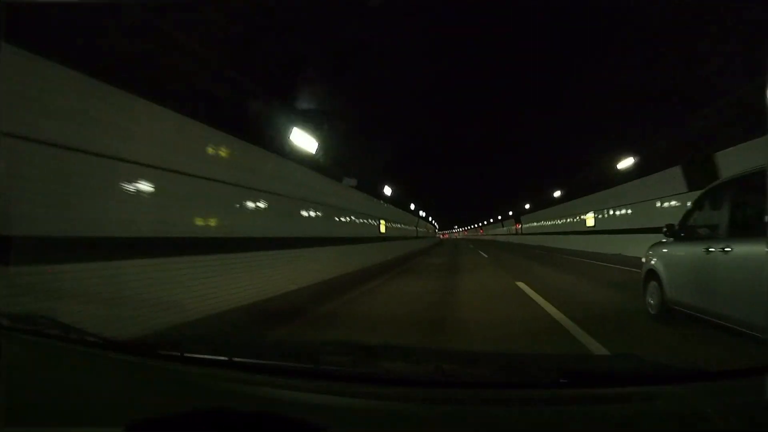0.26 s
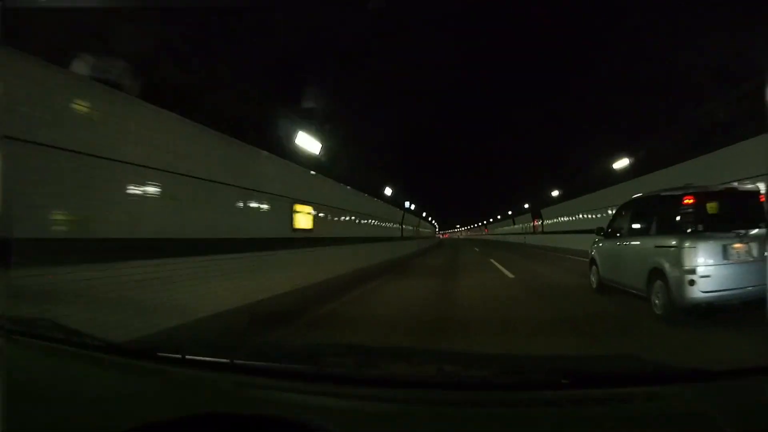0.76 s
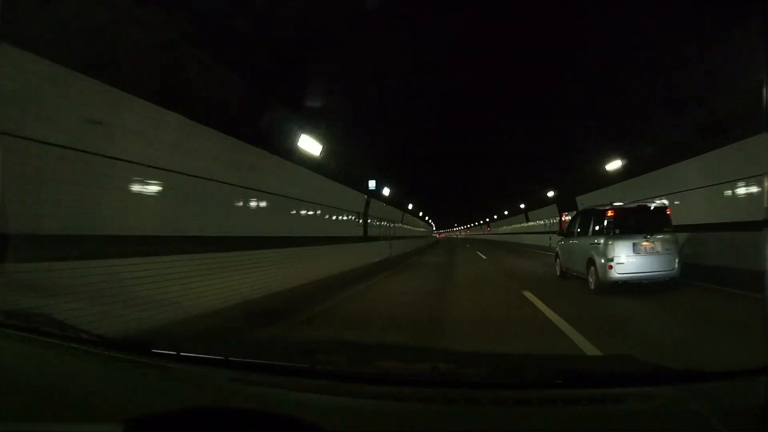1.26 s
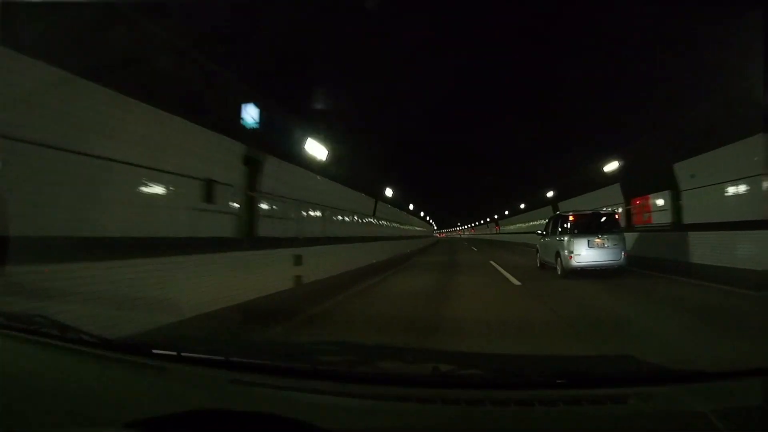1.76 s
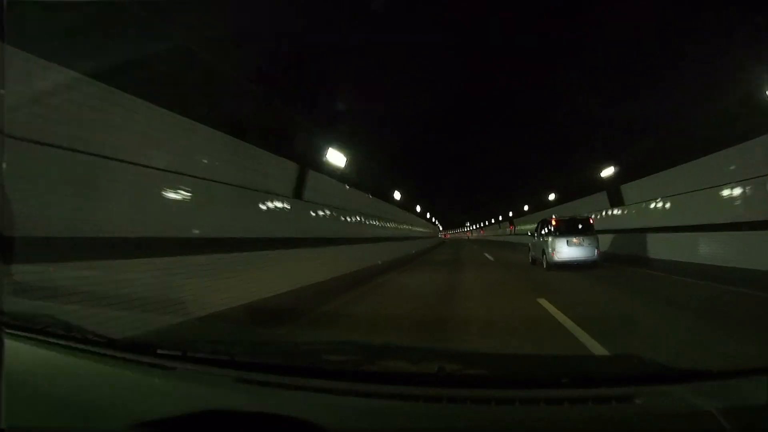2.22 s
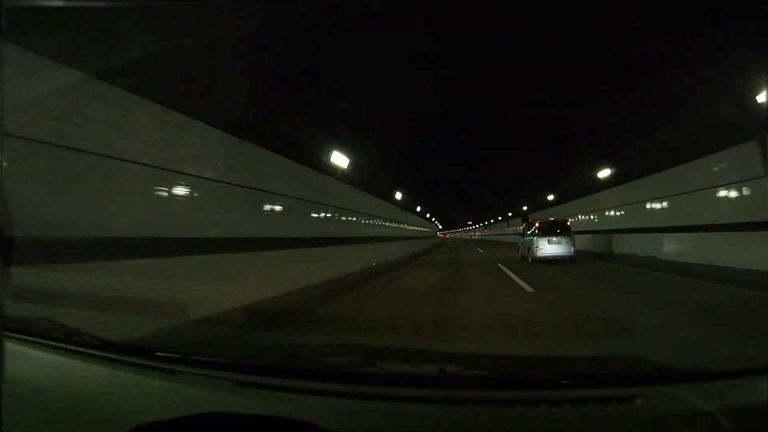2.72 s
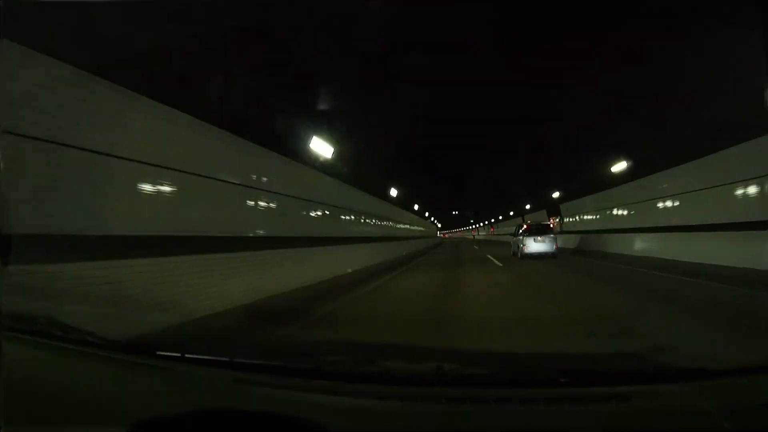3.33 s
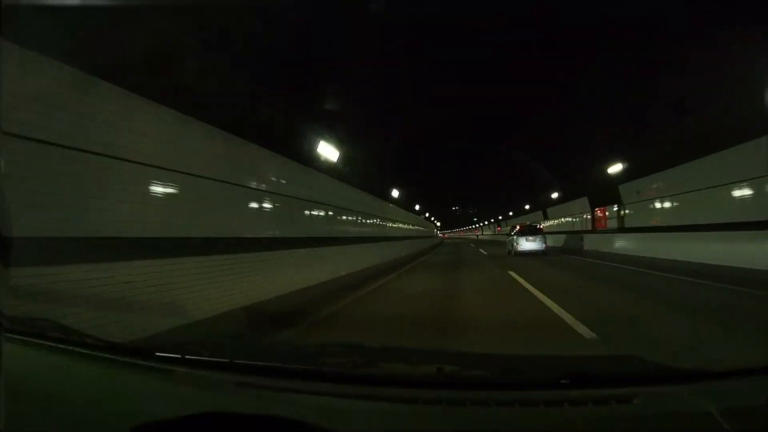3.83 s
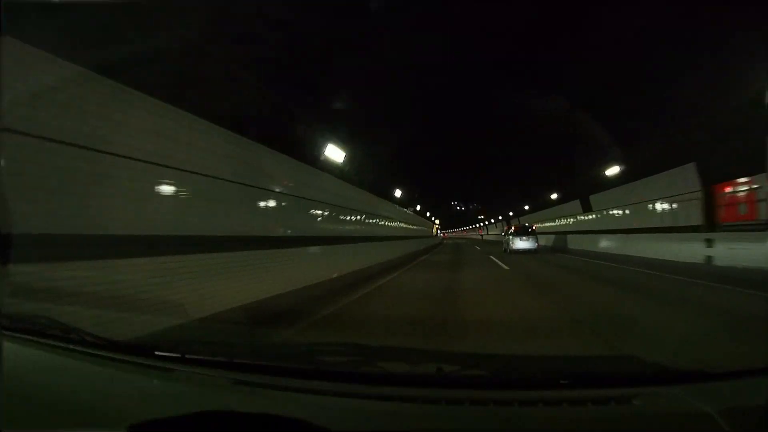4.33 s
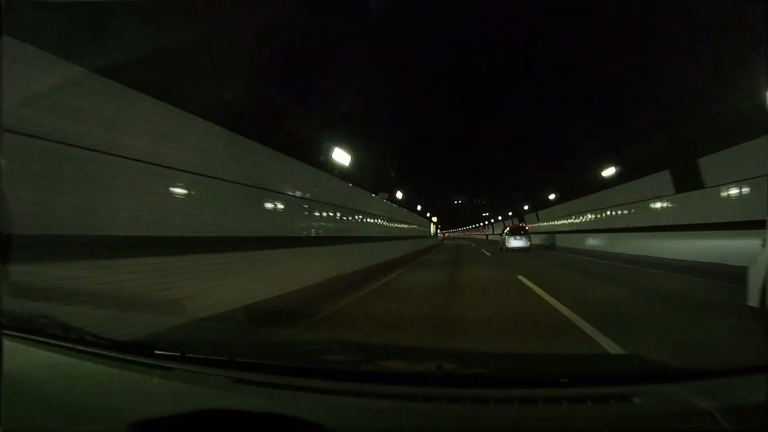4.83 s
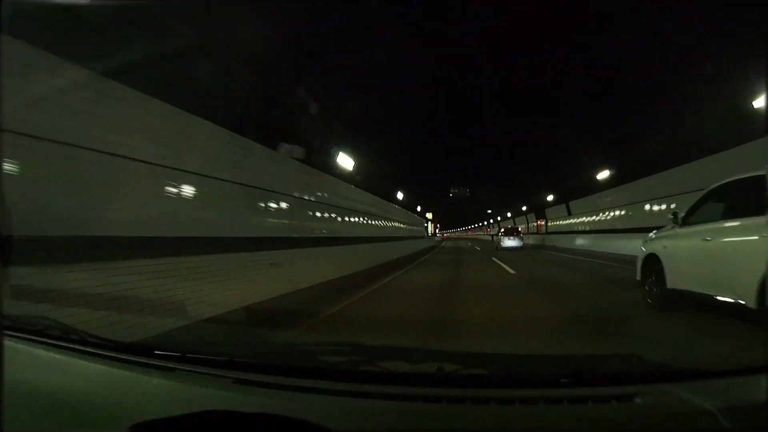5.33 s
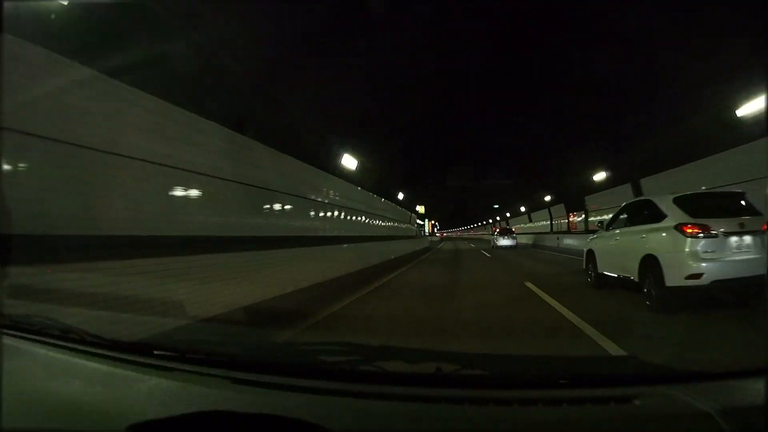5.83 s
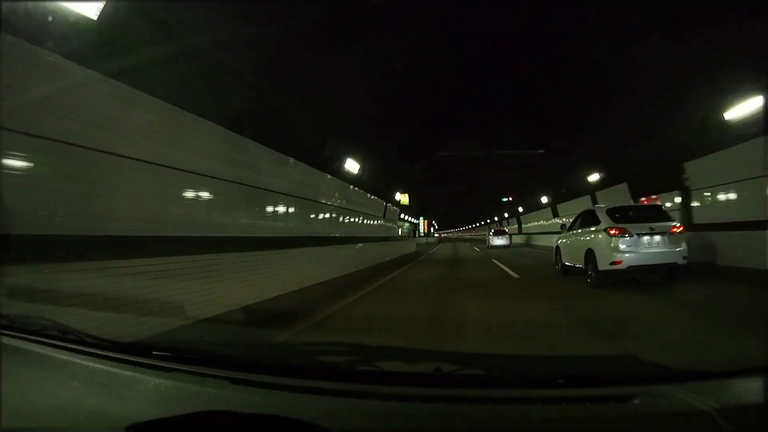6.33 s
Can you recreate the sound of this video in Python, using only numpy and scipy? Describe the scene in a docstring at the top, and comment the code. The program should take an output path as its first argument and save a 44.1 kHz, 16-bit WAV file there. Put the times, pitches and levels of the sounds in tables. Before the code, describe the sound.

Steady driving noise inside a car in a tunnel, picked up close by a small stereo microphone. Thick bass rumble lurches over road bumps, above a nearly buried engine drone. Fluttering tyre roar and thin window-seal hiss continue throughout. Trim snaps and rubs at two seconds, with a few weaker ticks near three. Overtaking cars add only subtle swells; the loudest booms are briefly squashed.

```python
"""A lumpy boom fills the cabin of a car cruising through a long road tunnel, heard from behind its windscreen.
Shaped noise makes the boom, tyre roar and hissing air; a faint engine drone is a sum of sines.
Two cars overtake as swells of tyre noise. Plastic trim ticks as decaying modes and rubs as grainy noise,
mostly about two seconds in. A recorder's limiter ducks the loudest crests."""
import sys
import numpy as np
from scipy import signal
from scipy.fft import rfft, irfft
from scipy.io import wavfile
from scipy.ndimage import uniform_filter1d

SR = 44100
rng = np.random.default_rng(int(sys.argv[2]) if len(sys.argv) > 2 else 0)


def transcribe(u):
    """Save the signal u as a 16-bit wav file named by the first command-line argument.

    u: samples, shape (n,) or (channels, n), limited to [-1, 1]; the rate is SR.
    q: integer samples, one column per channel.
    """
    v = np.clip(np.atleast_2d(u).T, -1, 1)
    q = np.round(v * 32767).astype(np.int16)
    wavfile.write(sys.argv[1], SR, q)


N = 289737
T, HZ = np.arange(N) / SR, np.fft.rfftfreq(N, 1 / SR)


def amp(db):
    """Decibel law: level in dB to amplitude ratio."""
    return 10 ** (np.asarray(db) / 20)


def unit(x):
    """Normalisation to a root-mean-square of 1."""
    return x / np.sqrt(np.mean(x ** 2) + 1e-20)


def along(points):
    """Logarithmic pitch scale: a table of (Hz, value) read at every frequency."""
    hz, value = np.transpose(points)
    return np.interp(np.log(HZ + 1), np.log(hz + 1), value)


def level(rows, order):
    """Amplitude envelope: one dB column of a time curve as a gain at every sample."""
    columns = np.transpose(rows)
    return amp(np.interp(T, columns[0], columns[order]))


def drift(rate_hz):
    """Band-limited random modulation of rms 1, up to about the given rate."""
    knots = rng.standard_normal(N // 32)
    return unit(np.interp(T * 2 * rate_hz, np.arange(len(knots)), knots))


def bell(middle_s, spread_s):
    """Gaussian envelope with a peak of 1."""
    return np.exp(-((T - middle_s) / spread_s) ** 2 / 2)


def swells(rows, order):
    """Superposed Gaussian swells in dB, their heights taken from one column of the events."""
    return sum(row[order] * bell(row[0], row[1]) for row in rows)


def resonance(hz, width_hz):
    """Resonance curve: a steep-sided gain peak at one frequency."""
    return 1 / (1 + ((HZ - hz) / (0.87 * width_hz)) ** 2)


def modes(rows):
    """Power addition: joint gain of several resonances, each at its own share in dB."""
    power = sum((amp(db) * unit(resonance(hz, width_hz))) ** 2 for hz, width_hz, db in rows)
    return np.sqrt(power)


def spectrum(points):
    """Spectral colouring: a table of (Hz, dB) as a gain that falls steeply past its last point."""
    return amp(along(points)) * np.minimum(1, points[-1][0] / (HZ + 1)) ** 8


# Likeness of the two microphone ports. Each row: frequency in Hz, correlation from 0 to 1.
PORT_LIKENESS = [(30, .99), (300, .996), (900, .97), (1500, .82), (2200, .62), (4000, .35), (6400, .15),
                 (7600, .6), (8400, .35), (11000, .3), (15000, .15)]
# Phase between the ports. Each row: frequency in Hz, lead of the left port in radians.
PORT_LEAD = [(25, .75), (60, .45), (125, .32), (280, .2), (700, 0), (1300, -.35), (2500, -.15), (3600, -.7),
             (5200, -2.9), (9500, -4.2), (11500, -6.3)]
# Balance of the ports. Each row: frequency in Hz, left minus right level in dB.
PORT_BALANCE = [(60, 0.5), (91, -3), (140, 0.7), (210, -0.2), (320, 0.3), (490, 1.7), (750, 2.5),
                (1150, 0.2), (1750, -1.2), (2660, -0.63)]


def cabin_noise(gain):
    """Spatial coherence: coloured noise at two close ports, alike in the bass and looser in the treble."""
    left, other = rng.standard_normal((2, len(HZ))) + 1j * rng.standard_normal((2, len(HZ)))
    same = np.clip(along(PORT_LIKENESS), 0, 1)
    lean = amp(along(PORT_BALANCE) / 2)
    right = (same * left + np.sqrt(1 - same ** 2) * other) * np.exp(-1j * along(PORT_LEAD))
    return unit(irfft(gain * np.array([left * lean, right / lean]), N))


def steadied(noise):
    """Power levelling over 0.2 s: evens out slow swells of a narrow noise and keeps its quick beats."""
    power = uniform_filter1d((noise ** 2).mean(0), size=SR // 5)
    return noise / np.sqrt(power + 1e-9)


# Long waves in the road work the suspension. Each row: time in seconds, deep shake in dB.
ROAD_WAVES = [(0, 2), (0.4, 0), (0.9, -3), (2.1, 3.5), (2.6, 1), (3.3, 1), (3.9, -4), (4.3, 5), (5.1, -2),
              (5.7, 0.5), (6.25, -3), (6.57, -9)]


def suspension_shake():
    """Amplitude modulation by the slow heave of the car on its suspension."""
    return level(ROAD_WAVES, order=1)


# Level of the tyre roar, with the limiter's dip after the boom at 4.6 s.
# Each row: time in seconds, base level in dB.
ROAR_LEVEL = [(0.0, -28.5), (0.25, -29.5), (0.53, -27.5), (0.71, -27), (0.82, -29.5), (1.02, -29),
              (1.4, -28), (1.6, -30), (2.1, -28), (2.34, -27), (2.68, -28.5), (2.85, -28), (3.0, -29.5),
              (3.3, -27.5), (3.43, -30), (3.58, -26.5), (3.88, -31), (4.09, -27), (4.33, -30), (4.55, -27),
              (4.65, -33.3), (4.82, -30), (5.01, -27), (5.14, -31), (5.4, -30), (5.56, -31), (5.68, -27.5),
              (5.88, -28.5), (6.06, -30), (6.57, -30.5)]


def follow(start_db, share, fade_db_per_s):
    """Shared modulation: a layer takes part in the tyre roar's swings and slowly fades."""
    swing = level(ROAR_LEVEL, order=1) / amp(-28.5)  # relative to a middling roar in dB
    return amp(start_db - fade_db_per_s * T) * swing ** share


# Bumps in the road. Each row: middle in seconds, spread in seconds, pitch shaken in Hz, swell in dB.
ROAD_BUMPS = [(0.09, 0.031, 269, 4.5), (0.326, 0.023, 180, 5), (0.693, 0.025, 266, 6), (.76, 0.047, 137, 2),
              (0.974, 0.027, 180, 7.5), (1.175, 0.084, 140, 7), (1.343, 0.15, 266, 4), (1.3, 0.18, 327, 4),
              (1.62, 0.16, 117, 6.5), (1.91, .06, 118, 9.5), (2.147, 0.076, 266, 5.5),
              (2.43, 0.091, 180, 3.5), (2.55, 0.028, 133.7, 17), (2.916, 0.099, 114, 4.5),
              (3.067, 0.072, 266, 6), (3.318, 0.073, 180, 6.5), (3.577, 0.033, 266, 7),
              (3.678, 0.076, 180, 9), (3.903, 0.047, 115, 7), (4.12, 0.12, 139, 6),
              (4.596, 0.038, 116, 12.5), (4.864, 0.069, 116, 4.5), (5.073, .07, 177, 8.5),
              (5.276, .15, 117, 9), (5.8, 0.099, 140, 10), (6.0, .3, 328, 8.5), (6.033, 0.058, 266, 8),
              (6.137, 0.019, 115, 14.5), (6.31, 0.082, 114, 6.5), (6.344, 0.094, 180, 4.5)]


def jolt(hz, reach_hz=9.5):
    """Selective excitation: a resonance swells on each bump that shakes the car near its pitch."""
    swell_db = 0
    for middle_s, spread_s, shake_hz, db in ROAD_BUMPS:
        nearness = np.exp(-((hz - shake_hz) / reach_hz) ** 2 / 2)
        swell_db = swell_db + db * nearness * bell(middle_s, spread_s)
    return amp(swell_db)


# Engine orders. Each row: multiple of the firing rate, middle level in dB before the shake.
FIRING_ORDERS = [(1, -42), (2, -52.5)]


def engine(firing_hz=70.1, waver_db=5.5, wander=0.0054):
    """Harmonic series: low firing orders wander slightly and swell as the body is shaken."""
    turns = np.cumsum(firing_hz * (1 + wander * drift(2.4))) / SR
    drone = 0
    for order, db in FIRING_ORDERS:
        drone = drone + amp(db + waver_db * drift(1.4)) * np.sin(2 * np.pi * order * turns)
    return suspension_shake() * drone


# Cars in the next lane. Each row: time alongside in seconds, spread in seconds, peak level in dB.
OVERTAKERS = [(0.104, 0.8, -41.5), (4.254, 0.47, -42.5)]
# Their tyre noise through the side windows. Each row: frequency in Hz, relative dB per Hz.
OVERTAKER_COLOUR = [(500, -40.5), (800, -9), (1050, 0.5), (1500, -1.5), (1750, -5.5), (2100, -28.5)]


def overtaking():
    """Level change with distance: the tyre noise of other cars swells and fades as they draw past."""
    near = sum(amp(db) * bell(middle_s, spread_s) for middle_s, spread_s, db in OVERTAKERS)
    return near * cabin_noise(spectrum(OVERTAKER_COLOUR))


# Air streaming over the body. Each row: frequency in Hz, relative dB per Hz.
AIR_COLOUR = [(1500, -30), (2200, -1.5), (2650, 0.5), (2950, -0.5), (3200, 1.9), (3450, -3), (3750, -5),
              (4500, -6), (5200, -12), (6500, -18.5)]
# Fine hiss at the window seals. Each row: frequency in Hz, relative dB per Hz.
SEAL_COLOUR = [(2400, -39), (5200, -3.5), (6400, 2.5), (7150, -0.5), (7600, -1), (8100, -2.5), (9200, -5.5),
               (12500, -11), (13500, -11.5), (15500, -16)]
# Gusts along the body. Each row: middle in seconds, spread in seconds, air change in dB, seal change in dB.
BODY_GUSTS = [(.62, 0.051, 2.5, 3), (1.02, 0.021, 0, 2), (1.21, .025, -1, 3), (1.42, 0.045, 1.5, 4.5),
              (2.16, 0.23, 2, 2.5), (2.44, 0.045, 1, 1.5), (2.88, 0.13, 1.5, 3), (4.34, 0.035, 1, 3.5),
              (4.55, 0.044, 1, 4), (5.63, 0.009, 2, 5), (6.12, 0.12, 2, 1), (6.26, .014, 0.5, 7)]
# Air, then seals. Each row: starting level in dB, share of the roar's swings from 0 to 1, fade in dB per s.
AIR_FOLLOW = (-49, 0.72, 0.25)
SEAL_FOLLOW = (-60, .3, 0.14)


def slipstream(gust_db=0.85, flicker_db=1.5, grain_db=1, waver_db=0.36):
    """Turbulent flow noise: air rushes by and hisses unevenly at the seals, with a faint fitful whistle."""
    rush = amp(swells(BODY_GUSTS, order=2) + gust_db * drift(14)) * cabin_noise(spectrum(AIR_COLOUR))
    unevenness_db = waver_db * drift(7) + flicker_db * drift(32) + grain_db * drift(400)
    flicker = amp(swells(BODY_GUSTS, order=3) + unevenness_db)
    hiss = cabin_noise(spectrum(SEAL_COLOUR))
    whistle = amp(-21.0 + 3.7 * drift(16)) * cabin_noise(resonance(hz=11070, width_hz=75))
    return follow(*AIR_FOLLOW) * rush + follow(*SEAL_FOLLOW) * flicker * (hiss + whistle)


# Tyre roar in the tunnel. Each row: frequency in Hz, relative dB per Hz.
ROAR_COLOUR = [(240, -51), (416, -14.5), (434, -1.5), (480, -0.5), (524, -1), (604, -1), (691, -1),
               (785, -5), (912, -7), (998, -3.5), (1080, -5.5), (1650, -10.5), (1780, -15.5), (1950, -18.5),
               (2190, -25.5), (2400, -30.5), (3120, -45.5), (5280, -120)]


def tyres(flutter_db=0.68):
    """Broadband contact noise off the tunnel walls, with the fuzzy note of air piping in the tread grooves."""
    roar = amp(-0.06 + flutter_db * drift(18)) * cabin_noise(spectrum(ROAR_COLOUR))
    grooves = amp(-14.5) * cabin_noise(resonance(hz=961, width_hz=44))
    return level(ROAR_LEVEL, order=1) * (roar + grooves)


# Air ringing inside the tyres. Each row: frequency in Hz, width in Hz, share in dB.
CAVITY_MODES = [(251.8, 9.6, 0), (279.4, 13.8, 1.6)]
# The row: starting level in dB, share of the roar's swings from 0 to 1, fade in dB per s.
CAVITY_FOLLOW = (-26.5, 0.32, 0.3)


def tyre_cavity():
    """Cavity resonance: the tyre air rings on bumps and slowly fades as the road surface changes."""
    middle_hz = np.mean(CAVITY_MODES, axis=0)[0]
    ring = steadied(cabin_noise(modes(CAVITY_MODES)))
    return follow(*CAVITY_FOLLOW) * jolt(middle_hz) * ring


# Rubs of the trim. Each row: middle in seconds, spread in seconds, rasp in dB, fizz minus rasp in dB.
TRIM_RUBS = [(0.462, .005, -56, 0), (1.969, .005, -49.5, 2), (1.987, .007, -45, -1),
             (2.023, 0.0037, -48, -2), (2.064, .006, -54, -4), (2.097, 0.0066, -45.5, -2),
             (2.143, .006, -53.5, 3), (2.175, 0.011, -46.5, -6), (2.199, .009, -56, 2),
             (2.235, .012, -61, 1), (2.765, .007, -58, 2), (2.84, .007, -54, 2), (2.884, .009, -57, -2),
             (2.913, .008, -55.5, 0), (3.034, .008, -56.5, 0)]


def trim_rubs(grain_db=4.0):
    """Friction noise: short grainy scuffs as the plastic slips, some raspy, some a thin fizz."""
    rasp = sum(amp(db) * bell(s, spread_s) for s, spread_s, db, fizz_db in TRIM_RUBS)
    fizz = sum(amp(db + fizz_db) * bell(s, spread_s) for s, spread_s, db, fizz_db in TRIM_RUBS)
    # colours as (Hz, relative dB per Hz)
    low = cabin_noise(spectrum([(200, -71), (3000, -9), (6300, -2.0), (9000, -9), (15500, -23)]))
    high = amp(-7) * cabin_noise(spectrum([(4000, -38), (9000, -2), (15500, -3)]))
    return amp(grain_db * drift(700)) * (rasp * low + fizz * high)


def add(mix, s, sound):
    """Superposition of a short sound onto the mix at a time in seconds."""
    part = mix[:, round(s * SR):][:, :sound.shape[1]]
    part += sound[:, :part.shape[1]]


# Ticks of the trim. Each row: start in seconds, snap strength in dB, knock strength in dB.
TRIM_TICKS = [(0.457, -40, -60), (1.9812, -32, -36), (1.997, -14.5, -31), (1.997, -20, -42),
              (1.9991, -25, -45), (2.0217, -45, -26.5), (2.0668, -26.5, -40), (2.096, -43, -22),
              (2.1653, -53, -27), (2.8898, -46, -31), (2.961, -55, -33), (4.556, -43, -39)]
# Modes of the plastic. Each row: middle frequency in Hz, relative level in dB,
# time to decay by 60 dB in seconds, left minus right level in dB.
TRIM_MODES = [(1420, -1, .007, -4), (1750, 6.5, 0.011, 10), (1990, 3, 0.012, 16), (2600, -1.5, .008, 12),
              (3140, -2, 0.0094, 11), (4530, -4, 0.006, 8), (5100, -6, 0.0074, 6), (6300, -2.5, .007, -1),
              (7250, -3, 0.0082, 2), (8070, -10.5, 0.006, 5), (9370, -17.5, 0.0078, 10),
              (14400, -16, .004, 6)]


def trim_ticks(split_hz=3400, lag_s=0.000231, snap_rise_s=0.0001, knock_rise_s=0.00067,
               scatter_db=-12, scatter_s=0.0015):
    """Modal excitation: a sharp snap rings the high modes, first at the left port; a blunt knock the low."""
    out, t = np.zeros((2, N)), np.arange(1500) / SR
    bright = signal.butter(2, [4200, 9000], "bandpass", fs=SR)
    for s, snap_db, knock_db in TRIM_TICKS:
        tick = np.zeros((2, len(t)))
        for k, (hz, db, t60, lean_db) in enumerate(TRIM_MODES):
            high = 1 / (1 + (split_hz / hz) ** 24)  # near 0 for low modes, near 1 for high ones
            age = np.maximum(t - high * lag_s * np.array([[0], [1]]), 0)
            snap = high * amp(snap_db) * (1 - np.exp(-age / snap_rise_s))
            knock = (1 - high) * amp(knock_db) * (1 - np.exp(-age / knock_rise_s))
            tuned_hz = hz * (1 + 0.014 * rng.standard_normal())
            ring = (-1) ** k * np.sin(2 * np.pi * tuned_hz * age)
            lean = amp([[lean_db / 2], [-lean_db / 2]])
            tick += (snap + knock) * amp(db - 60 * age / t60) * lean * ring
        # glass and dashboard scatter the snap within a few milliseconds
        echoes = signal.lfilter(*bright, np.exp(-t / scatter_s) * rng.standard_normal(tick.shape))
        add(out, s, tick + amp(snap_db + scatter_db) * echoes)
    return out


# Road rumble through the body. Each row: frequency in Hz, relative dB per Hz.
RUMBLE_COLOUR = [(15, -50.5), (30, -28), (50, -7.5), (80, -3), (110, 3.5), (135, 1), (160, 0.5),
                 (235, -0.5), (320, -1.4), (365, -6.5), (398, -11), (430, -19), (520, -50)]
# Its upper part, riding on the roar's level. The row: starting gain in dB, share of the swings from 0 to 1,
# fade in dB per s.
RUMBLE_FOLLOW = (0.29, 0.67, 0.054)


def road_rumble(rumble_db=-23, surge_db=1.5):
    """Structure-borne sound: the rough road shakes the shell."""
    rumble = amp(rumble_db) * cabin_noise(spectrum(RUMBLE_COLOUR))
    # the deepest part follows the suspension, the rest the level of the roar
    deep = irfft(rfft(rumble) / (1 + (HZ / 80) ** 8), N)
    upper_gain = follow(*RUMBLE_FOLLOW) * amp(surge_db * drift(9))
    return suspension_shake() * deep + upper_gain * (rumble - deep)


# Lesser resonances of the cabin. Each row: frequency in Hz, width in Hz, level in dB between bumps.
LESSER_BOOMS = [(127.2, 11, -33), (145.4, 10, -31), (196.8, 9, -32.5), (213.6, 15, -32.5), (322.6, 21, -39),
                (360.3, 6.8, -42)]
# The two strongest, with the same columns.
STRONG_LOW_BOOM = (113.1, 6.8, -30)
STRONG_MIDDLE_BOOM = (179.6, 8.9, -26)


def cabin_boom():
    """Room modes: each resonance of the cabin air beats at random and swells on bumps near its pitch."""
    booms = 0
    for hz, width_hz, db in list(LESSER_BOOMS) + [STRONG_LOW_BOOM, STRONG_MIDDLE_BOOM]:
        booms = booms + amp(db) * jolt(hz) * steadied(cabin_noise(resonance(hz, width_hz)))
    return booms


def scene():
    """Linear superposition of all sources at the two ports."""
    outside = engine() + overtaking() + slipstream() + tyres() + tyre_cavity()
    trim = trim_rubs() + trim_ticks()
    return outside + trim + road_rumble() + cabin_boom()


def record(dry, ceiling_db=-8.5, recovery_db_per_s=70, treble_weight=0.3, edge_hz=15800):
    """Peak limiting, most alert to treble, ducks both ports at loud crests; then a low-pass limits the band."""
    sensed = abs(dry) + treble_weight * abs(np.gradient(dry, axis=1))
    over_db = np.maximum(20 * np.log10(sensed.max(0) + 1e-9) - ceiling_db, 0)
    # the ducking jumps up at a crest and recovers at a constant rate
    fall_db = T * recovery_db_per_s
    duck_db = np.maximum.accumulate(over_db + fall_db) - fall_db
    smooth_db = uniform_filter1d(uniform_filter1d(duck_db, size=50), size=50)
    limited = dry * amp(-smooth_db)
    limited = limited * np.minimum(1, np.minimum(T, T[::-1]) / 0.003)  # 3 ms fades at both ends
    low_pass = signal.firwin(511, edge_hz, window=("kaiser", 9), fs=SR)
    return signal.oaconvolve(limited, low_pass[None], "same")


dry = scene()
out = record(dry)
transcribe(out)
```